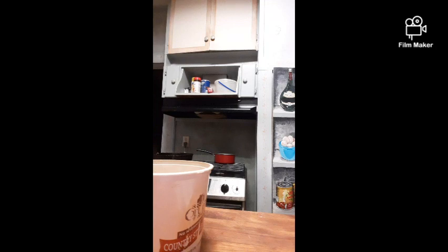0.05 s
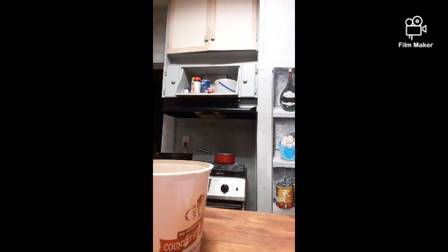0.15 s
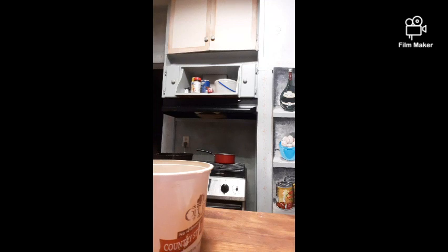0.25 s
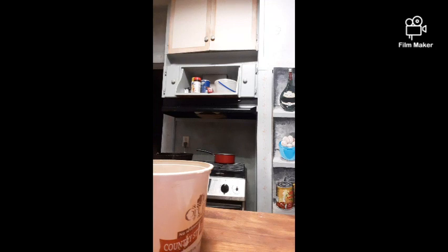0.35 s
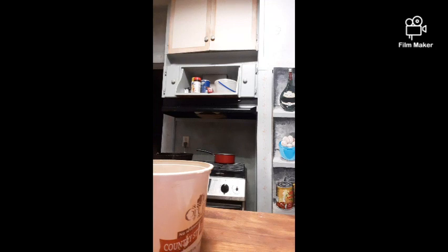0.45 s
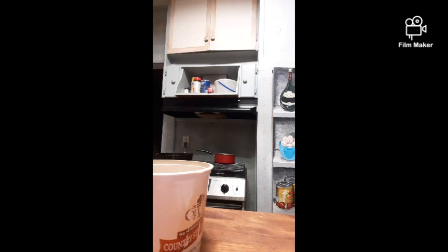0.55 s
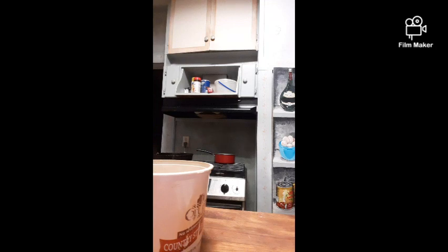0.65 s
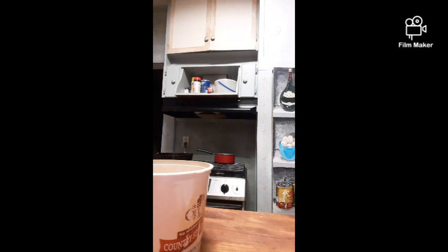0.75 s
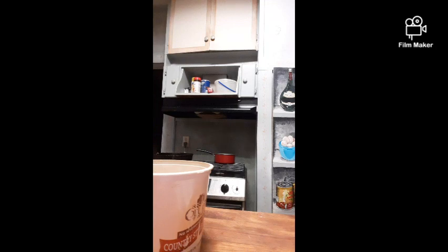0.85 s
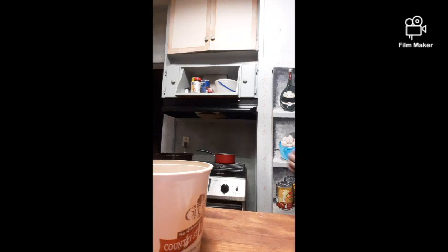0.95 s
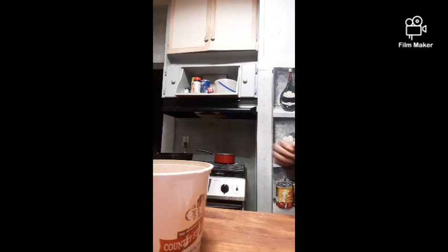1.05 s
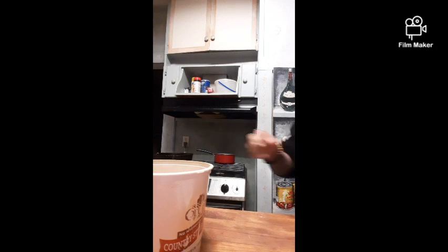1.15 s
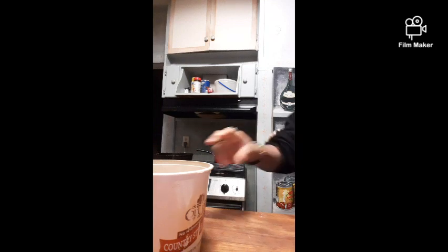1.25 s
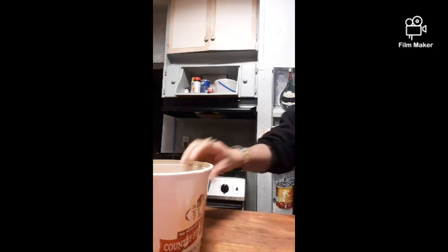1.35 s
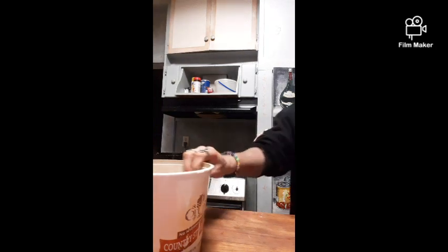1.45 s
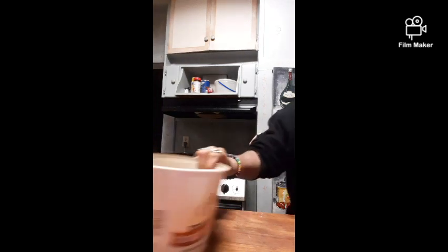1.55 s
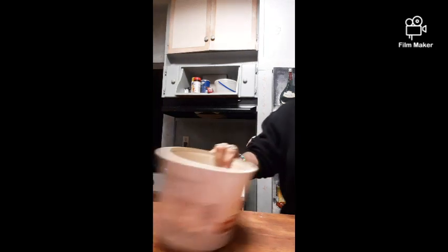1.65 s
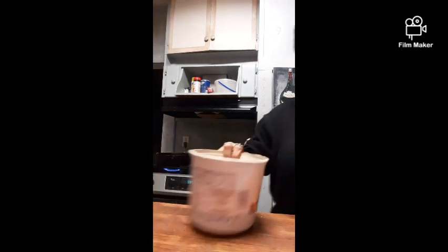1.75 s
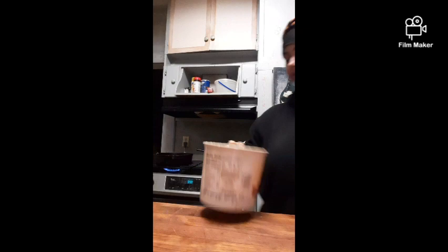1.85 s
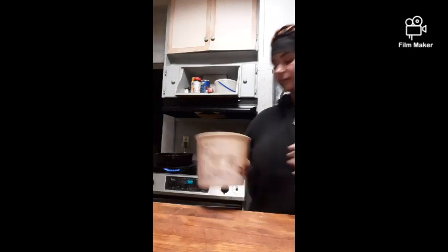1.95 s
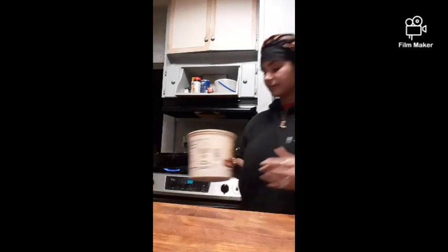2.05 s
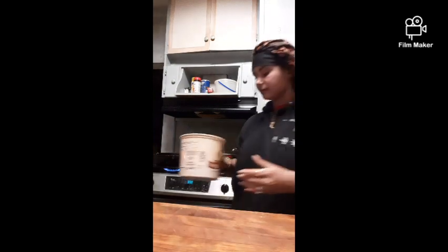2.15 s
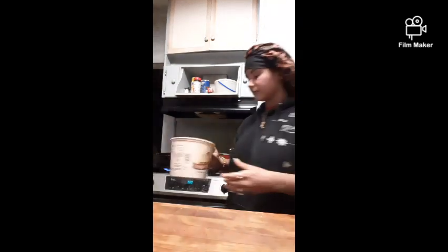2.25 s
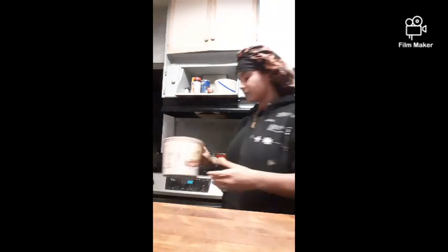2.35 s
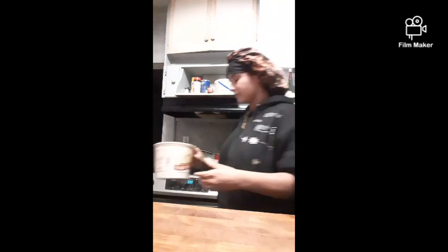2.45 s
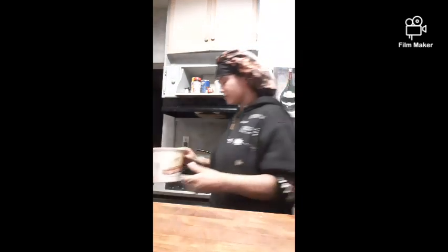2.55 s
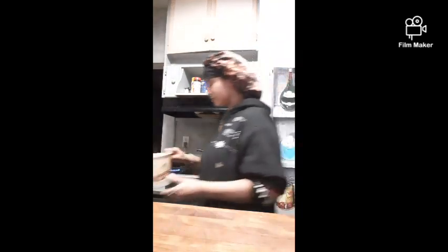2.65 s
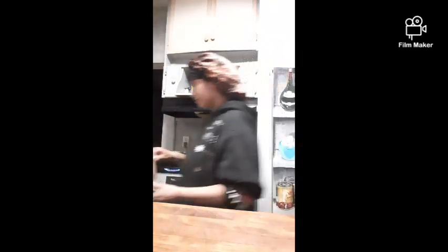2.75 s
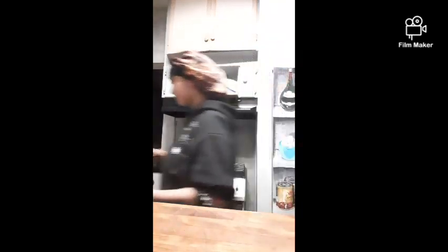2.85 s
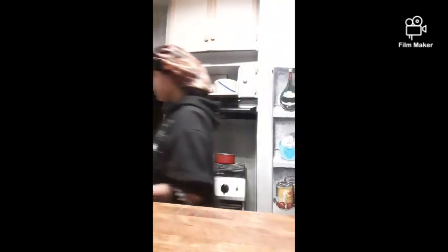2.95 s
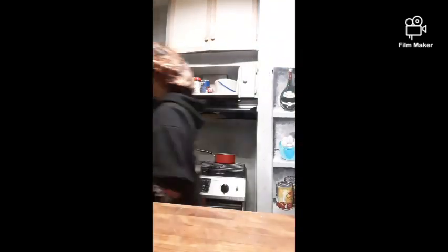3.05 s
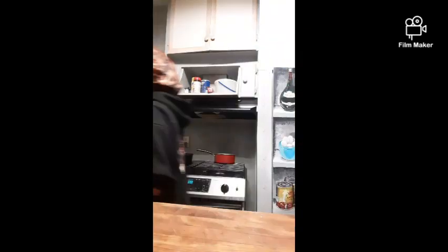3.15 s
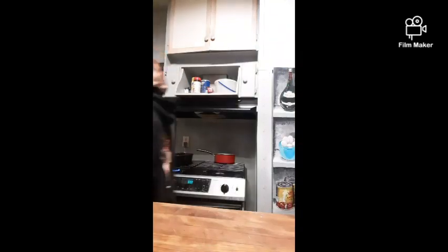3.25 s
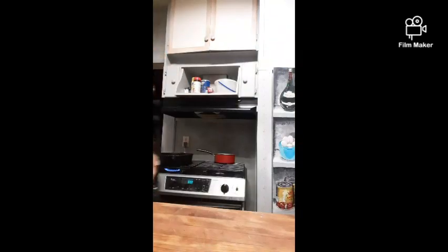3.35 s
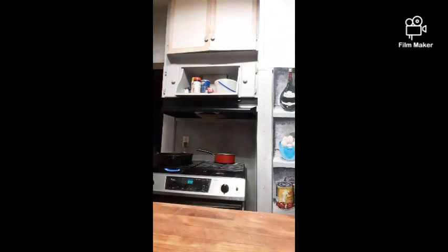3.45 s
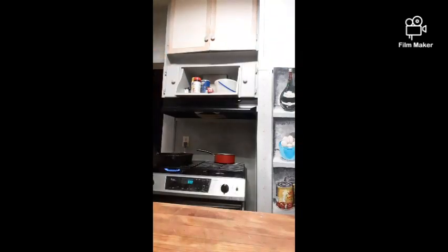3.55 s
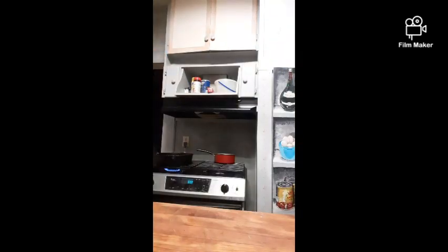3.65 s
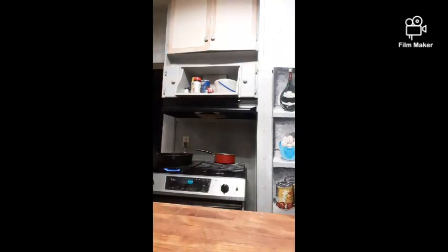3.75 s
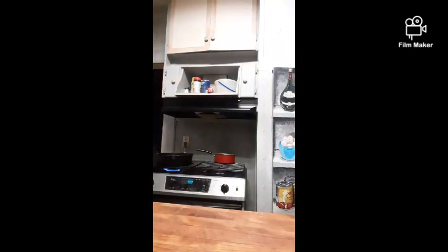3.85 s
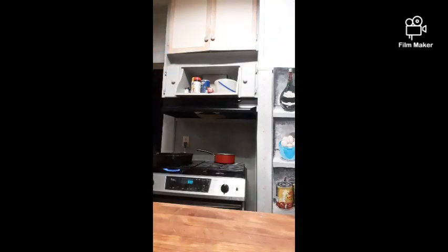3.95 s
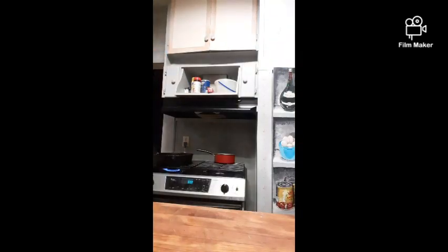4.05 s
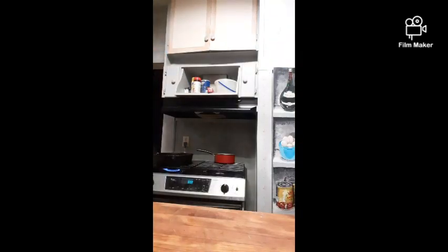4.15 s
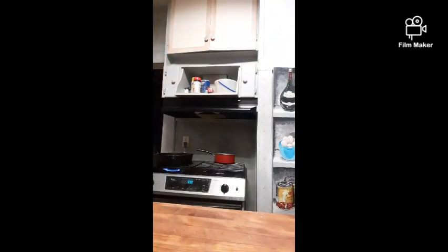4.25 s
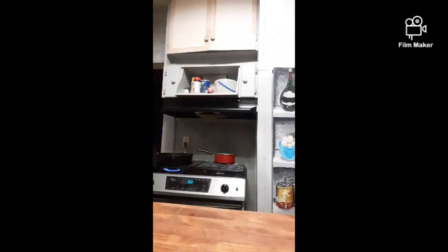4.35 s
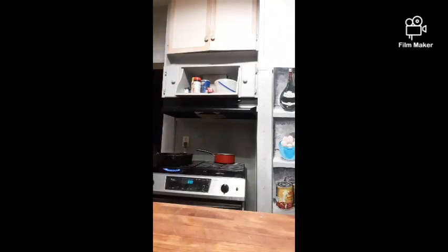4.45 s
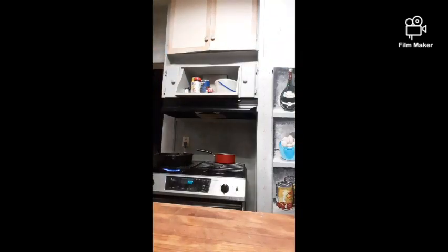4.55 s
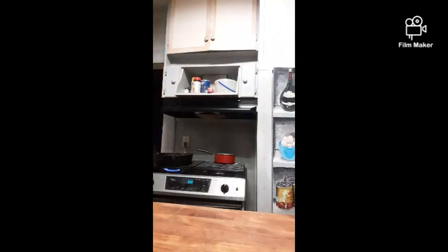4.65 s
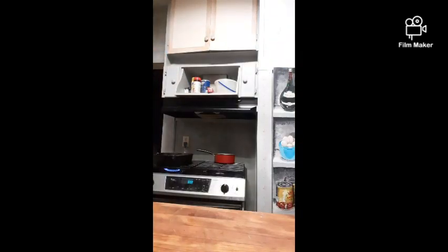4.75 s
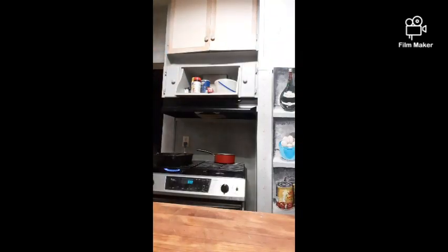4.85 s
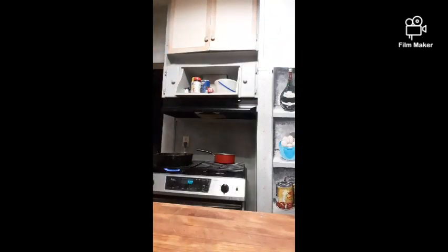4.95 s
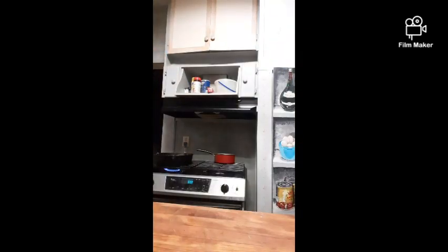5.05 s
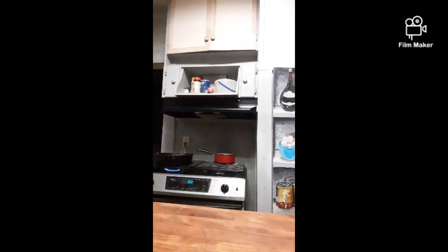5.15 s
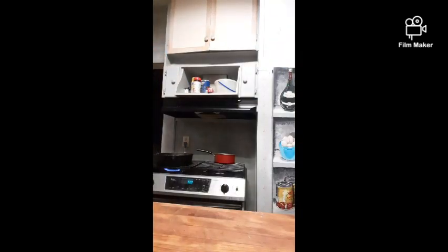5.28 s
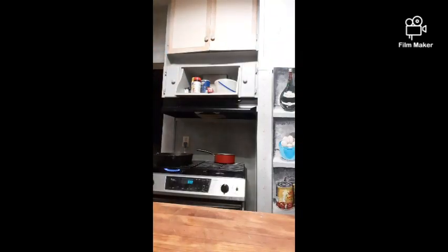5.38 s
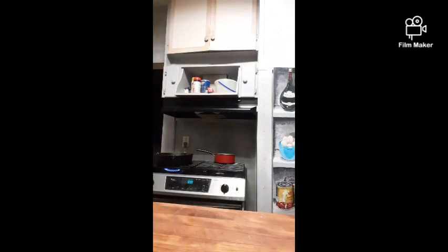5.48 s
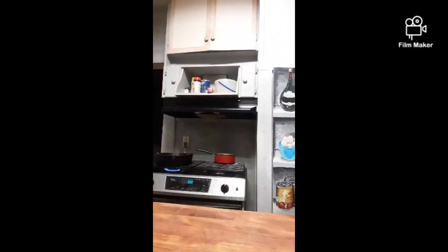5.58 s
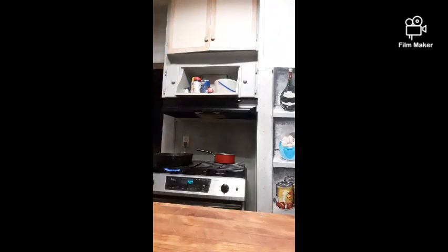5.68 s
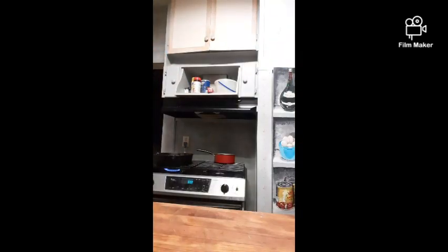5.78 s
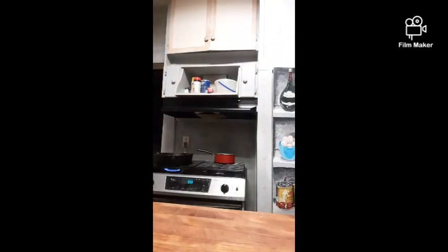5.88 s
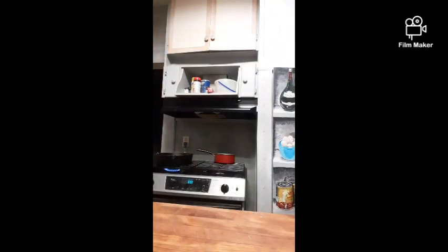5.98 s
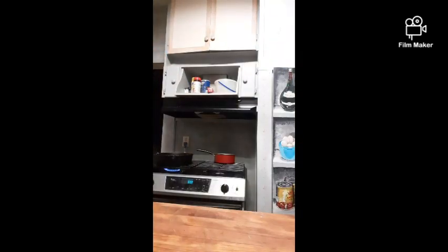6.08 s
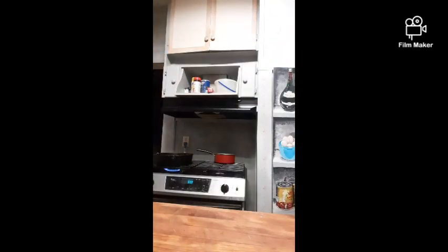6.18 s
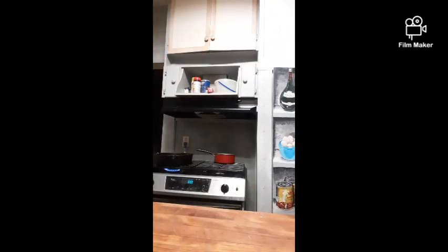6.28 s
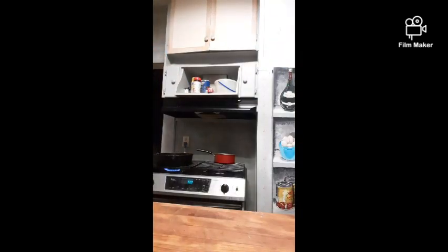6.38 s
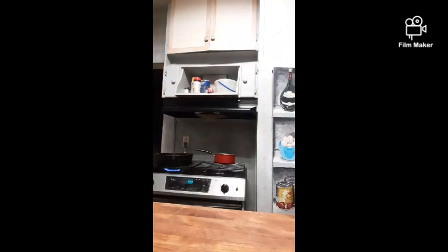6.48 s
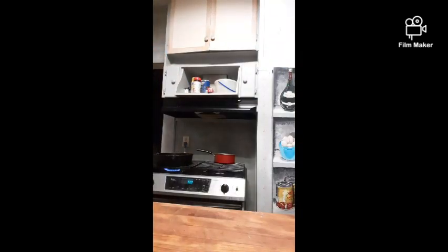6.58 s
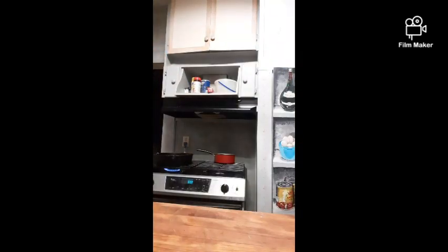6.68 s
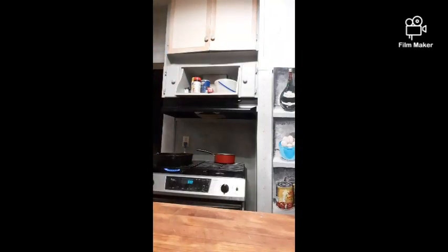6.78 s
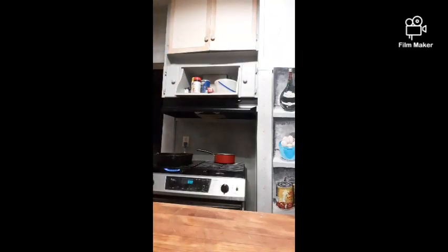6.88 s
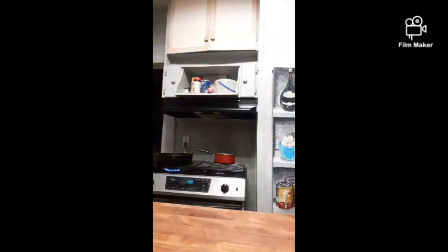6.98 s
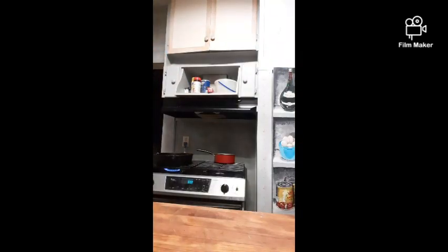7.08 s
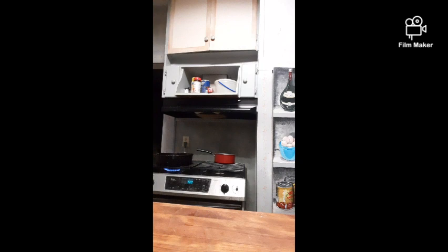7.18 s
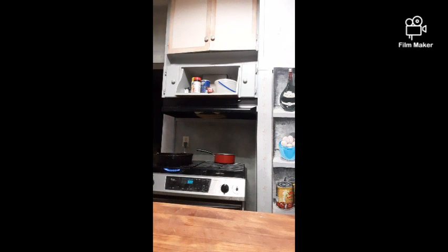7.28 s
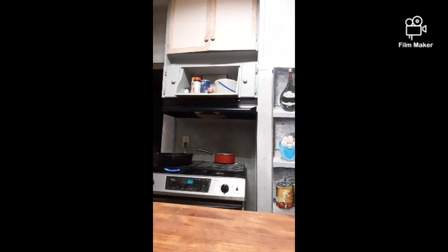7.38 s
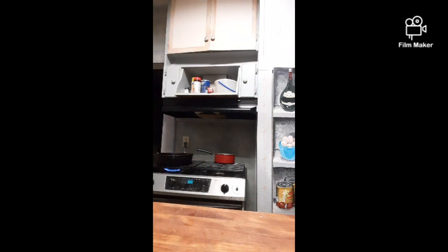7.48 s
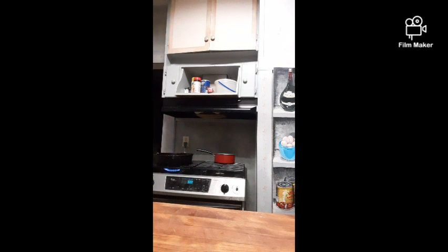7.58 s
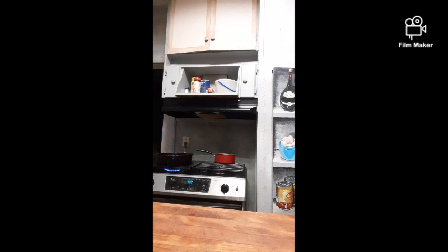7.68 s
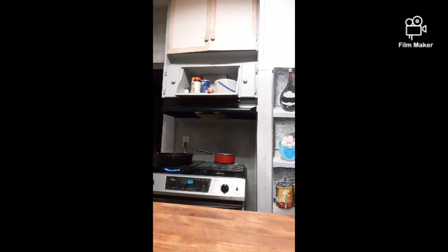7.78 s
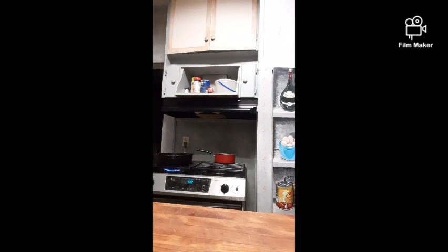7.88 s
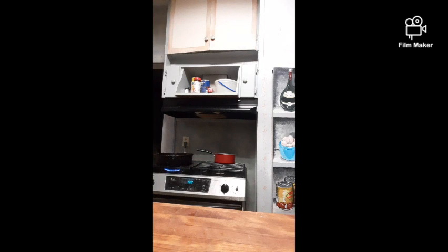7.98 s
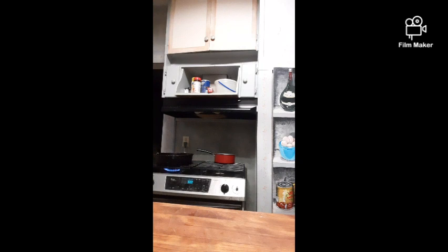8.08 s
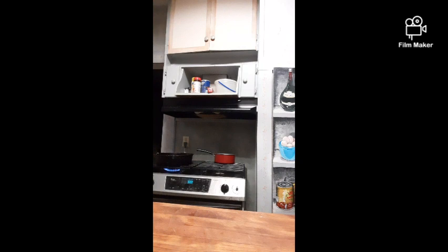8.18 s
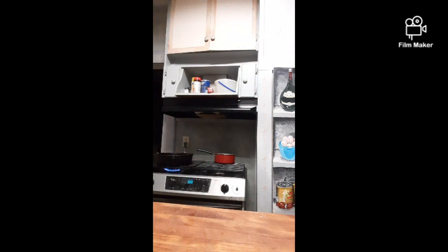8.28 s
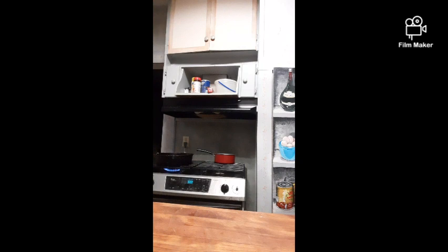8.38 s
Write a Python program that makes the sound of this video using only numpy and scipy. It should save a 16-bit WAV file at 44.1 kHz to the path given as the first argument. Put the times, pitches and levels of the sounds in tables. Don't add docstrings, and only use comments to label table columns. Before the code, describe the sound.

Throughout about 8.4 seconds, a gas burner across a small kitchen gives a steady, wide, bright hiss over a soft low roar, wavering only slightly. Right at the start, two small hollow plastic knocks and a tiny rising air gulp sound close by, with a faint brush and a weaker gulp by 0.15. Hand or sleeve brushes faintly at 1.2. At 1.5 comes the most distinct event: a tight cluster of hard plastic clicks and a dull knock on the wooden counter, then four quick rocks fading by about 1.65. A short brush at 1.7 and longer cloth swishes around 2.3-2.4 follow. Soft-soled steps land near 2.8, 3.5, 4.1, 4.7, 5.25 and 5.7-6.0, mostly muffled under the hiss. From 6.0 the hiss brightens very slightly; two light scuffs pass at 6.5, then only the burner continues to the end. The room reverberation is short.

```python
import sys
import numpy as np
from scipy import signal
from scipy.fft import rfft, irfft, next_fast_len
from scipy.io import wavfile

SR = 44100
rng = np.random.default_rng(int(sys.argv[2]) if len(sys.argv) > 2 else 0)


def undo_db(level):
    steps = np.asarray(level, float) / 20
    return 10 ** steps


def persist_wave(psi):
    counts = np.round(np.clip(psi, -1, 1) * 32767).astype(np.int16)
    wavfile.write(sys.argv[1], SR, np.atleast_2d(counts).T)


N = 371322


def at_hz(points, hz):
    table_hz, value = np.transpose(points)
    return np.interp(np.log(hz + 1), np.log(table_hz), value)


def bell(hz, centre_hz, width_hz):
    return 1 / (1 + (2 * (hz - centre_hz) / width_hz) ** 2)


ROOM_T60_S, ROOM_DB = 0.43, -5.5


def room_response():
    t = np.arange(SR // 2) / SR
    shared, own = rng.standard_normal(len(t)), rng.standard_normal((2, len(t)))
    bass, treble = (signal.butter(2, 650, kind, fs=SR) for kind in ("low", "high"))
    noise = signal.lfilter(*bass, shared) + signal.lfilter(*treble, own)
    tail = noise * undo_db(-60 * t / ROOM_T60_S) * (t > .004)
    response = undo_db(ROOM_DB) * tail / np.sqrt(np.sum(tail ** 2) / 2)
    response[:, 0] = 1
    return response


def struck(contact, low_hz, high_hz):
    sound = signal.sosfilt(signal.butter(2, [low_hz, high_hz], "band", fs=SR, output="sos"), contact)
    return sound / np.abs(sound).max()


# (mode [Hz], t60 [s])
THUMP = [(57, 0.17), (85, 0.073)]
# body as multiples of its centre, the others in Hz
BODY, CLACK_HZ, SNAP_HZ = (0.67, 1.52), (510, 1170), (1700, 4200)


def blows(table, rise_s, contact_s, hardness, clack_db):
    out, t = np.zeros(N + SR), np.arange(SR // 3) / SR
    push = np.exp(-t / contact_s) * (1 - np.exp(-t / rise_s))
    modes = sum(np.sin(2 * np.pi * hz * t) * undo_db(-60 * t / t60_s) for hz, t60_s in THUMP)
    heave = modes * (1 - np.exp(-t / rise_s / 2)) / 2
    for s, peak_db, body_hz, weight_db, sharp_db in table:
        rough = rng.standard_normal(len(t)) * push
        touch = rough + hardness * (t == 0)
        body = struck(touch, BODY[0] * body_hz, BODY[1] * body_hz)
        bright = undo_db(clack_db) * struck(rough, *CLACK_HZ) + struck(rough, *SNAP_HZ)
        sound = body + undo_db(weight_db + 15) * heave + undo_db(sharp_db) * bright
        out[round(s * SR):][:len(t)] += undo_db(peak_db) * sound
    return out[:N]


# (time [s], peak [dB], body centre [Hz], weight [dB], sharpness [dB])
STEPS = [
    (2.804, -30.5, 280, -32, -1.5),
    (3.519, -35, 294, -22, -2),
    (4.099, -40, 310, -16, -14),
    (4.685, -34, 260, -18, 0.5),
    (5.243, -29, 420, -26, -17),
    (5.26, -31, 436, -26, -15),
    (5.729, -39, 334, -23, 0),
    (5.999, -38, 404, -23, -4),
]


def steps():
    return blows(STEPS, rise_s=0.0067, contact_s=0.012, hardness=0, clack_db=0)


# (loudest time [s], length [s], rms level [dB], first centre [Hz], last centre [Hz])
SCUFFS = [
    (1.213, 0.11, -43, 800, 1100),
    (1.698, 0.073, -41, 600, 1000),
    (2.284, .15, -35, 4140, 1090),
    (2.412, 0.25, -41, 2400, 3300),
    (5.61, .1, -48, 4800, 4800),
    (6.459, 0.086, -42, 2200, 1900),
    (6.536, 0.094, -43, 1800, 1600),
    (0.061, .14, -43, 1300, 800),
]
SCUFF_RISE_SHARE, SCUFF_EDGE_DB = .4, -11


def scuffs():
    out = np.zeros(N)
    for s, length_s, rms_db, first_hz, last_hz in SCUFFS:
        start = round((s - SCUFF_RISE_SHARE * length_s) * SR)
        along = np.linspace(0, 1, round(length_s * SR))
        swell_db = np.interp(along, [0, SCUFF_RISE_SHARE, 1], [SCUFF_EDGE_DB, 0, SCUFF_EDGE_DB])
        centre_hz = first_hz * (last_hz / first_hz) ** along
        grains = rng.standard_normal(len(along)) * undo_db(1.5 * rng.exponential(1, len(along)))
        rub, state = np.zeros(len(along)), np.zeros((2, 2))
        for i in range(0, len(along), 128):
            sos = signal.butter(2, centre_hz[i] * np.array([.55, 1.9]), "band", fs=SR, output="sos")
            rub[i:i + 128], state = signal.sosfilt(sos, grains[i:i + 128], zi=state)
        out[start:start + len(along)] += undo_db(rms_db + swell_db) * rub / rub.std()
    return out


# (time [s], peak [dB], first pitch [Hz])
GULPS = [
    (.025, -27.5, 300),
    (0.139, -34, 285),
]
GULP_S, GULP_PITCH_RATIO = 0.0143, 1.96


def gulps():
    out = np.zeros(N)
    along = np.linspace(0, 1, round(GULP_S * SR))
    swell = np.sqrt(np.sin(np.pi * along).clip(0))
    for s, peak_db, first_hz in GULPS:
        turns = np.cumsum(first_hz * GULP_PITCH_RATIO ** along) / SR
        out[round(s * SR):][:len(along)] += undo_db(peak_db) * swell * np.sin(2 * np.pi * turns)
    return out


# (time [s], peak [dB], body centre [Hz], weight [dB], sharpness [dB])
KNOCKS = [
    (.019, -29, 480, -27, -3),
    (.045, -31, 330, -22, -2),
    (1.5, -26.5, 303, -19, 3.5),
    (1.51, -30.5, 384, -23, 8),
    (1.519, -24, 256, -20, -1),
]
ROCK_S, ROCK_GAP_S, ROCK_DB, ROCK_LOSS_DB = 1.545, .022, -26.5, 3.2
ROCK_HZ, ROCK_WEIGHT_DB, ROCK_SHARP_DB = 324, -25, -7


def tub():
    rocks = [(ROCK_S + k * ROCK_GAP_S, ROCK_DB - k * ROCK_LOSS_DB, ROCK_HZ, ROCK_WEIGHT_DB, ROCK_SHARP_DB)
             for k in range(4)]
    return blows(KNOCKS + rocks, rise_s=.0006, contact_s=0.01, hardness=19, clack_db=-6.5) + gulps()


CONTROL = 40


def drift(rate_hz):
    r = np.exp(-2 * np.pi * rate_hz * CONTROL / SR)
    settle = 2000
    slow = signal.lfilter([1], [1, -2 * r, r * r], rng.standard_normal(N // CONTROL + 2 + settle))[settle:]
    return slow / slow.std()


# (frequency [Hz], left minus right [dB])
TILT = [(60, 7), (92, 5), (140, 3.5), (210, 3), (330, 1.5), (500, 0), (770, -3), (1170, 1.5), (1790, -0.5),
        (2740, 6.5), (4190, 2.5), (6410, 3.5), (9810, 10), (15000, 1)]
# (frequency [Hz], likeness of channels [0-1])
DIFFUSE = [(40, 0.96), (92, 0.72), (140, 0.99), (330, 0.99), (500, 0.9), (770, 0.22), (1100, 0.01),
           (16000, 0.0027)]
# (centre [Hz], width [Hz], lift [dB])
STANDING = [(60.6, 20, 7), (121, 21, 5), (170, 17, 4.5), (230.4, 9, 4.5), (268, 7.1, 0.5), (328, 34, 2.5),
            (420, 19, 2), (1750, 46, 4), (2630, 130, -1.5), (4160, 990, -0.5)]
# (centre [Hz], width [Hz], left [dB],
# right [dB])
TREBLE_BELLS = [(5440, 460, 4, -3.5), (7000, 360, -1, -4), (10730, 2650, -7, 4), (9500, 410, -0.5, 0),
                (12500, 1500, 1.5, 0)]
DIRECT_SHARE, LAG_S, RIPPLE = 0.2, 0.000437, 0.54


def at_microphones(spectrum, hz, room):
    draws = rng.standard_normal((2, 4, len(hz)))
    direct, shared, left, right = draws[0] + 1j * draws[1]
    alike = np.clip(at_hz(DIFFUSE, hz), 0, 1)
    share = DIRECT_SHARE * (hz > 1000)
    diffuse = np.sqrt(alike) * shared + np.sqrt(1 - alike) * np.array([left, right])
    late = np.exp(-2j * np.pi * hz * LAG_S * np.array([[0], [1]]))
    level_db = at_hz(spectrum, hz) + at_hz(TILT, hz) * np.array([[.5], [-.5]])
    for centre_hz, width_hz, lift_db in STANDING:
        level_db = level_db + lift_db * bell(hz, centre_hz, width_hz)
    for centre_hz, width_hz, left_db, right_db in TREBLE_BELLS:
        level_db = level_db + np.array([[left_db], [right_db]]) * bell(hz, centre_hz, width_hz)
    ripple = np.abs(rfft(room, 2 * len(hz) - 2)) ** RIPPLE
    return (np.sqrt(share) * direct * late + np.sqrt(1 - share) * diffuse) * undo_db(level_db) * ripple


def patchy(sound, hz, low_hz, high_hz, flutter_db, sway_db, waver_db):
    out, half_octave = 0, np.log2(hz + 1) * 2
    for k in range(round(np.log2(low_hz) * 2), round(np.log2(high_hz) * 2)):
        window = np.cos(np.clip(half_octave - k, -1, 1) * np.pi / 2) ** 2
        band = irfft(sound * window.astype(np.float32))[:, :N]
        gain = undo_db(flutter_db + sway_db * drift(9.3) + waver_db * drift(7.4))
        out = out + band * np.interp(np.arange(N) / CONTROL, np.arange(len(gain)), gain)
    return out / np.sqrt(np.mean(out.mean(axis=0) ** 2))


# (frequency [Hz], density [dB per Hz])
ROAR = [(12, -72), (20, -59), (46, -20.5), (90, -21), (113, -14), (164, -6.5), (199, -6.5), (295, 2.5),
        (362, -5), (460, -7), (605, -13.5), (809, -17), (1200, -6), (1560, -43), (2640, -120)]
# (frequency [Hz], density [dB per Hz])
JET = [(350, -24.5), (600, -6), (818, -10.5), (1070, -10.5), (1160, -7), (1290, -6.5), (1690, -3.5),
       (1910, -4), (2500, 0.5), (2790, 1.5), (3900, 2.5), (4520, 4), (6000, -0.5), (10900, -5),
       (15000, -14.5)]
# (time [s], level [dB])
OPEN_PATH = [(0, -0.5), (.5, -1), (2.1, -1), (2.4, 0), (3.1, -1.5), (3.6, -0.7), (5.0, -0.2), (5.7, -0.6),
             (6.4, 0), (8.42, -0.5)]
# (level [dB], share of path swing [ratio])
LAYERS = [
    (-47, 0.99),
    (-45.5, 2),
    (-41.5, 1.4),
    (-42, 0.16),
]
GREASE_S, GREASE_RISE_S, GREASE_DB = 6.0, .3, 0.83


def burner(room):
    t = np.arange(N) / SR
    path_db = np.interp(t, *np.transpose(OPEN_PATH))
    roar_db, body_db, hiss_db, top_db = (level_db + share * path_db for level_db, share in LAYERS)
    top_db = top_db + GREASE_DB * np.clip((t - GREASE_S) / GREASE_RISE_S, 0, 1)
    hz = np.fft.rfftfreq(2 * next_fast_len(N // 2 + 1), 1 / SR)
    flow = drift(6.2)
    jet = at_microphones(JET, hz, room).astype(np.complex64)
    flame = at_microphones(ROAR, hz, room).astype(np.complex64)
    roar = patchy(flame, hz, 28, 1500, .4 * flow, sway_db=.5, waver_db=.6)
    body = patchy(jet, hz, 500, 3400, .35 * flow, sway_db=.55, waver_db=.5)
    hiss = patchy(jet, hz, 3400, 6800, .25 * flow, sway_db=.15, waver_db=.45)
    top = patchy(jet, hz, 6800, 21000, .5 * drift(14), sway_db=.15, waver_db=.55)
    return undo_db(roar_db) * roar + undo_db(body_db) * body + undo_db(hiss_db) * hiss + undo_db(top_db) * top


def scene():
    room = room_response()
    far = signal.fftconvolve((steps() + scuffs())[None], room, axes=1)[:, :N]
    near = signal.fftconvolve(tub()[None], room, axes=1)[:, :N]
    return far * undo_db([[-1.3], [-.3]]) + near * undo_db([[-.5], [-2.2]]) + burner(room)


def roll_off(x):
    return signal.sosfilt(signal.butter(12, 15750, fs=SR, output="sos"), x)


MIC_LOW_HZ = 36


def record(dry):
    heard = signal.sosfilt(signal.butter(2, MIC_LOW_HZ, "high", fs=SR, output="sos"), dry)
    return roll_off(heard)


dry = scene()
out = record(dry)
persist_wave(out)
```